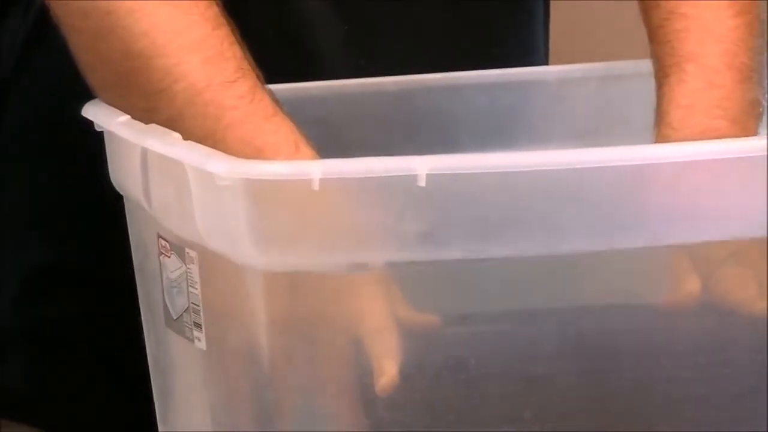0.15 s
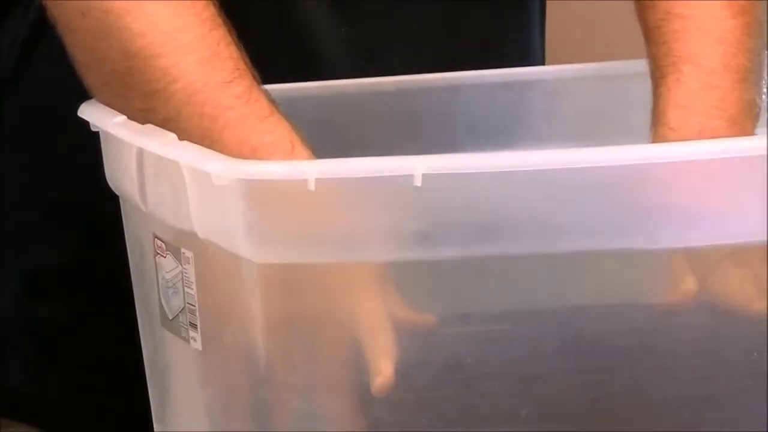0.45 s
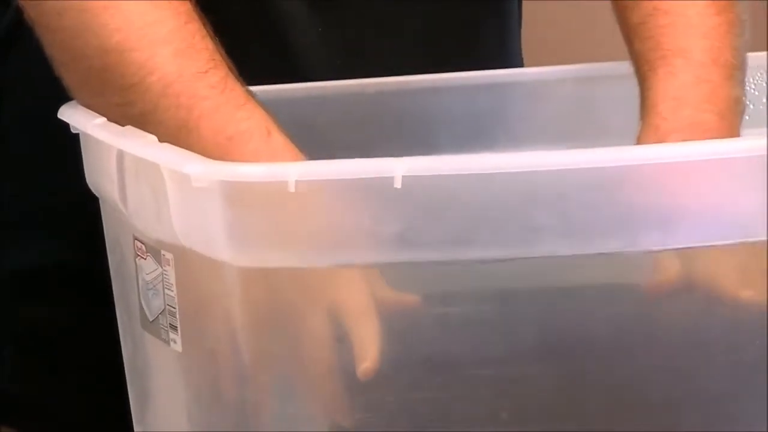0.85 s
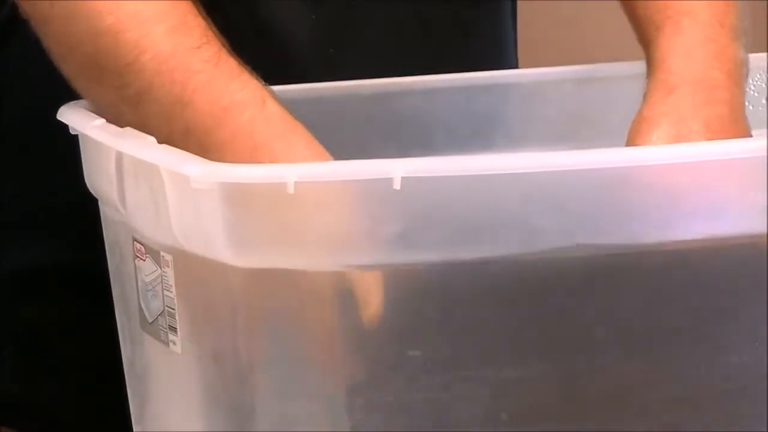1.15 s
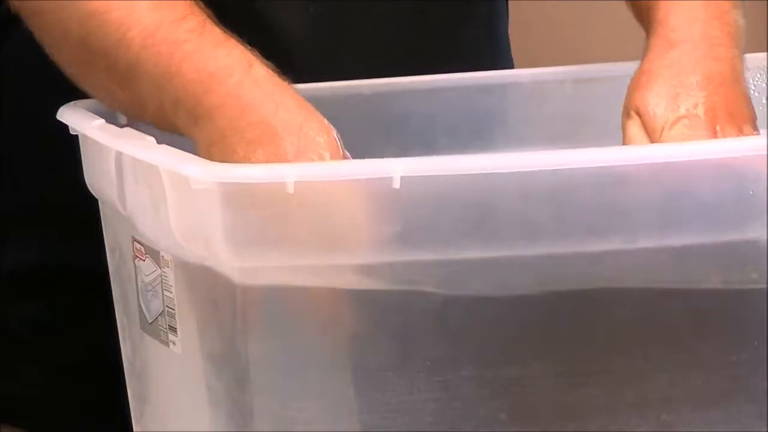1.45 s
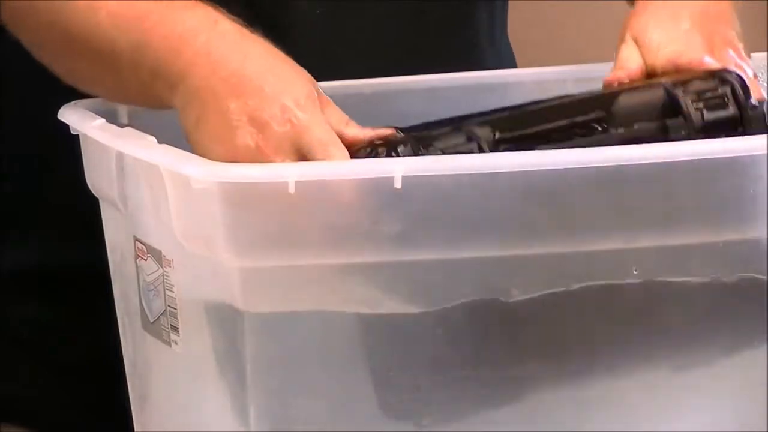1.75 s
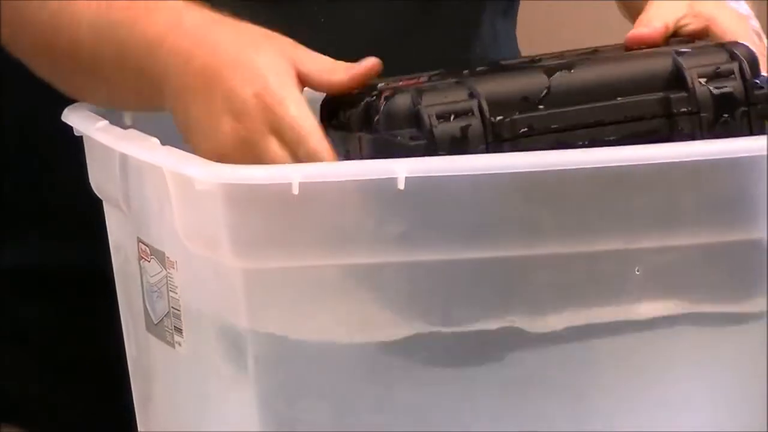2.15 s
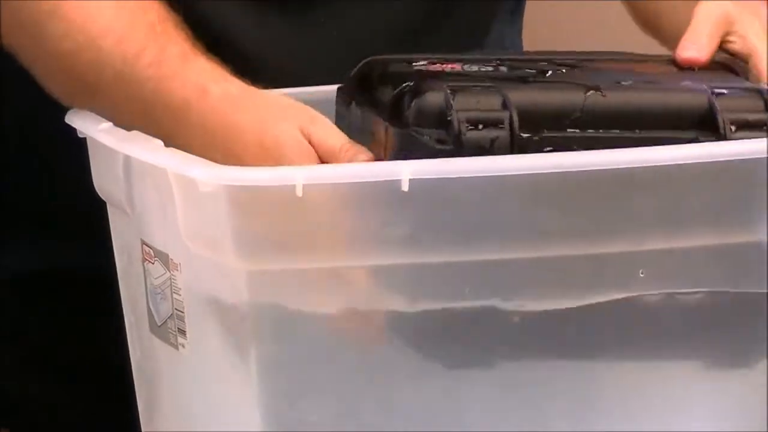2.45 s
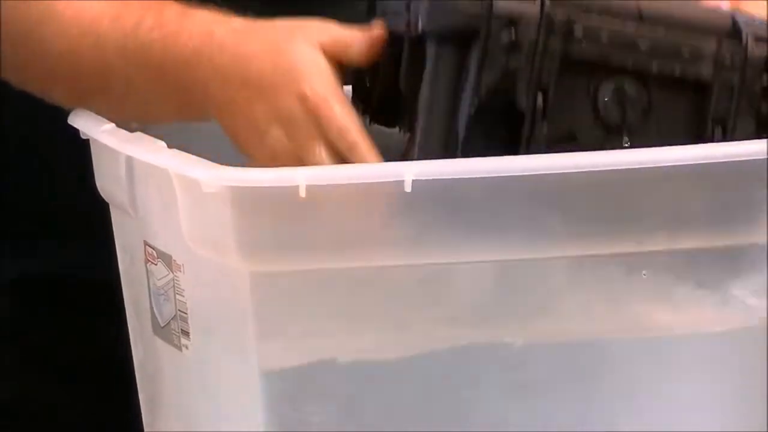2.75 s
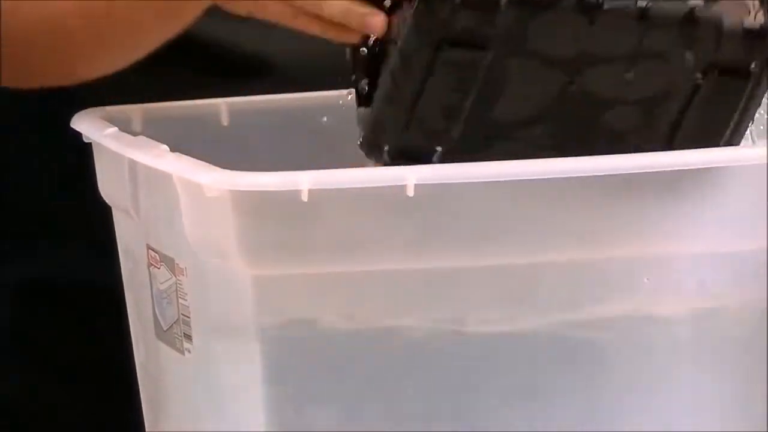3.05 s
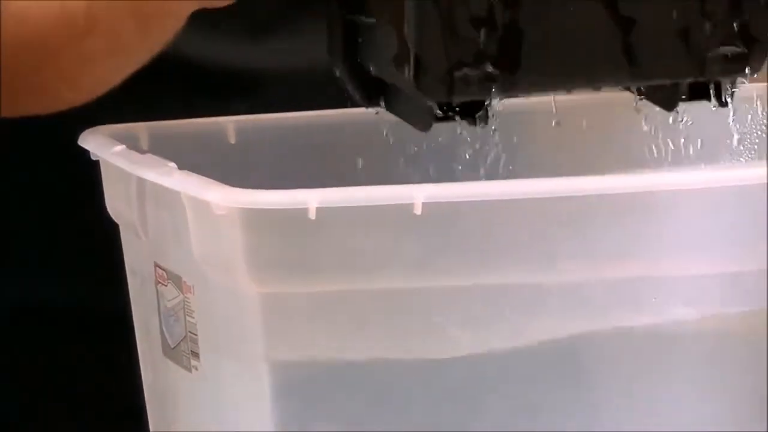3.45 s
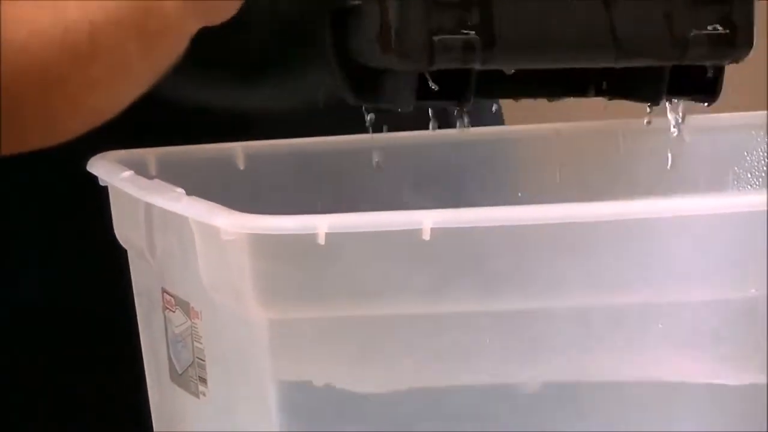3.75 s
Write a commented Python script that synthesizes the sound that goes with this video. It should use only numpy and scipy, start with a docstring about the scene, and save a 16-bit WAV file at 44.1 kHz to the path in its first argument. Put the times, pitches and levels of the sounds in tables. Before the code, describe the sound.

After over a second of near quiet with low room hum, water gushes and bubbles off a lifted case, eases, then streams and drips back into the tub with a plastic click, heard close indoors.

```python
"""Plastic case lifted from a tub of water

A hard plastic case comes out of a plastic tub in a quiet room; water splashes off, then drains.
Trapped bubbles plop as swelling sines, crowds of bubbles ring as resonators, spray is coloured clicks.
Plastic ticks are noise bursts with ringing modes. Ventilation rumbles as coloured noise, a motor whines
as a wavering sine, a faint patter opens the scene, and scattered echoes make the room."""
import sys
import numpy as np
from scipy import signal
from scipy.fft import rfft, irfft
from scipy.io import wavfile

SR = 44100
rng = np.random.default_rng(int(sys.argv[2]) if len(sys.argv) > 2 else 0)


def put_to_file(sound):
    """Save the sound as 16-bit audio at rate SR, in the file named by the first command-line argument."""
    columns = np.atleast_2d(sound).T  # one column per channel
    safe = np.clip(columns, -1, 1)
    whole_steps = np.round(safe * 32767)
    wavfile.write(sys.argv[1], SR, whole_steps.astype(np.int16))


def attenuation_scalar(level_db):
    """Turn a level in dB into a linear amplitude multiplier (20 dB per decade)."""
    decades = np.asarray(level_db, float) / 20
    return 10 ** decades


N = 171990

# ventilation colour, relative: hz, level_db (per Hz)
AIR_COLOUR = [(12, -60), (20, -45), (37, -36), (107, -1.5), (167, -19.5), (187, -16.5), (241, -10.5),
              (277, -17), (623, -17), (677, -23), (737, -17.5), (1250, -25), (2070, -22.5), (2740, -26.5),
              (16000, -40)]
# how alike the air is left and right: hz, likeness (0 to 1)
AIR_LIKENESS = [(30, 0.53), (120, 0.95), (250, 0.66), (600, 0.057), (2000, 0.13), (5000, 0.088),
                (12000, 0.024)]
# stereo balance of the air: hz, left_minus_right_db
AIR_BALANCE = [(30, 3.5), (250, 0), (2000, 0.3), (12000, 0.5)]
# duct resonances: centre_hz, width_hz, level_db
DUCT_RESONANCES = [(57.4, 15, -66), (109.3, 18, -60), (157.2, 13, -61.5), (243.2, 48, -57.5),
                   (311.3, 15, -65.5), (1755, 11, -73), (2300, 110, -68)]
# motor whine: pitch_hz, wobble_hz, level_db
MOTOR_WHINE = (2098, 10, -65.5)
# level of the faint patter: time_s, level_db
PATTER_LEVEL = [(0, -65), (.4, -63.5), (.41, -90)]
# plastic ticks: start_s, level_db (before a 9 dB cut), tilt_db (per octave), left_minus_right_db
TICKS = [(0.1098, -36.5, 5, 4), (0.6943, -35.5, 5.5, 4.5), (2.8799, -35.5, 6, 5), (3.6531, -21, 3.5, -6)]
# colour of the plastic before each tick's tilt, relative: hz, level_db (per Hz)
TICK_COLOUR = [(180, -53), (300, -1), (1500, -4), (2130, 3), (4400, -5.5), (5080, -10), (6270, -20.5),
               (14000, -47)]
# ringing modes of the plastic: pitch_hz, level_db (before a 20 dB cut), t60_s
TICK_MODES = [(1443, -14.5, 0.069), (2780, -11.5, 0.028), (4250, -7, 0.017)]
# streams running off: time_s, fine_spray_db, small_bubbles_db, large_bubbles_db
STREAMS = [(1.38, -91, -89, -72), (1.79, -55.5, -72, -69.5), (1.85, -54.5, -47, -53), (1.98, -54, -46, -50),
           (2.13, -47, -47.5, -50.5), (2.3, -58, -59, -54.5), (2.54, -66, -66, -64.5),
           (3.04, -66.5, -61.5, -65.5), (3.41, -56.5, -62, -55.5), (3.9, -66, -58, -67)]
# sheets of water hitting the surface: landing_s, fine_spray_db, small_bubbles_db (both before a cut), t60_s
SHEETS = [(1.4467, -50.5, -48.5, 0.97), (1.536, -41, -66, 0.082), (1.683, -57, -49, 0.42),
          (1.78, -40, -36.5, 0.59), (1.8494, -50, -45, 0.2), (1.908, -40, -53, 0.42),
          (2.027, -44, -39, 0.35), (2.0976, -33.5, -29.5, 0.11), (2.1795, -38, -35.5, 0.47),
          (2.26, -56, -43, 0.33), (2.463, -45, -44.5, 0.17), (2.9155, -54, -43, 0.17),
          (3.072, -54, -66, 0.64), (3.163, -41, -58, 0.28), (3.2216, -43, -63, 0.68),
          (3.2594, -45, -48, 0.5), (3.3312, -46, -38.5, 0.48), (3.4394, -42.5, -61, 0.17),
          (3.5902, -47.5, -48.5, 0.67)]
# spray colour, relative: hz, level_db (per Hz)
SPRAY_COLOUR = [(2940, -1.5), (5000, 0), (6040, -1.5), (8200, -7), (11000, -8.5), (14500, -17.5),
                (16000, -37)]
# bubble crowds: births_per_s (approximate), low_hz, high_hz, ring_cycles (to -60 dB), trim_db
SMALL_BUBBLES = (1000, 2300, 6986, 26, -3.5)
LARGE_BUBBLES = (900, 1050, 3000, 22, 3)
SLOSH_BUBBLES = (400, 200, 350, 9, 0.1)
# water rocking in the tub: time_s, level_db
SLOSH_LEVEL = [(2.9, -65.5), (3.25, -57), (3.38, -60.5), (3.44, -50.5), (3.58, -66), (3.67, -45.5),
               (3.75, -69), (3.9, -56)]
# single bubbles that stand out: time_s, peak_db, pitch_hz, swarm_db (relative, before the size law)
PLOPS = [(2.219, -43.5, 548, -9), (2.249, -51, 474, -18), (1.445, -56.5, 710, -8), (1.942, -38, 1120, -14),
         (1.964, -40, 1320, -10), (1.999, -44, 1320, -2), (2.089, -43, 1200, -3), (2.124, -39, 1100, -15),
         (2.138, -42.5, 827, -1), (2.182, -27, 760, -24), (2.228, -38.5, 733, -14), (2.483, -39, 1215, -18),
         (2.512, -44.5, 1165, -11), (3.239, -45.5, 1075, 0), (3.272, -46, 1024, -11),
         (3.332, -40, 1220, -18), (3.591, -49, 934, -20), (3.674, -40, 1197, -28), (1.4606, -49, 1350, -8),
         (1.8238, -44.5, 1530, 2.5), (2.0363, -40.5, 1470, 3.5), (2.0862, -35.5, 1564, -8),
         (2.15, -35.5, 1510, -7), (2.2573, -39.5, 1488, -3), (2.2857, -38.5, 1470, -8.5),
         (2.3052, -36.5, 1425, -20), (2.47, -42.5, 1470, -15), (2.733, -54, 1390, -20),
         (3.0914, -55, 1410, 2), (3.1423, -53, 1400, -6), (3.3154, -45.5, 1350, 2),
         (3.4526, -31.5, 1482, -9), (3.7575, -31.5, 1500, -7), (1.4626, -54.5, 1770, 5),
         (1.7275, -45.5, 2530, -5), (1.8592, -38.5, 1656, -11), (1.8994, -40.5, 1877, -2.5),
         (2.2174, -33.5, 2380, -4), (2.362, -42.5, 2340, -19), (2.374, -43, 1960, -21),
         (3.2041, -44, 1980, -17), (3.2555, -39, 2300, -4.5), (3.3638, -45, 2250, -9),
         (3.3817, -37, 2280, -0.5), (3.4376, -40, 1930, -9), (3.4855, -33.5, 1952, -8),
         (3.4994, -37.5, 1830, -14), (3.5892, -27, 1967, -23), (3.657, -31, 2090, -43),
         (3.8277, -41, 2300, -12), (1.4451, -55, 2860, -11), (1.497, -46, 4150, -18),
         (1.5359, -49, 3630, -14), (1.6831, -46, 3280, 0.5), (1.7975, -35.5, 2976, -1),
         (1.804, -30.5, 3234, -12), (1.8194, -35, 3350, -15), (2.0183, -30, 2576, -10),
         (2.1001, -40, 2890, -1), (2.2074, -43, 2780, 0.5), (2.8, -52.5, 3130, -2),
         (2.9158, -44.5, 2713, 0), (3.1647, -45, 4300, -12), (3.1936, -43.5, 4130, -2),
         (3.2194, -48, 4200, -13), (3.3333, -36.5, 4080, -6), (3.3494, -35, 3800, -12),
         (3.3677, -45, 3160, 0.5), (3.8706, -40.5, 3280, -5), (1.7489, -50, 5300, -2),
         (1.9056, -38, 6020, -3.5), (2.0308, -34.5, 4350, -1), (2.5336, -49, 5000, -4),
         (3.2375, -44, 4800, -3), (3.248, -35, 4900, -8), (3.2874, -41, 4560, -1), (3.3094, -39, 4360, -5),
         (3.3867, -40.5, 5900, -3), (3.4855, -50, 5600, 4.5), (3.8766, -47, 5000, -9),
         (3.0709, -50.5, 10740, -2.5), (3.709, -55.5, 8750, 2.5)]

WATER_PAN_DB = -1  # left minus right


def rms_one(x):
    """Scale to unit rms."""
    return x / np.sqrt(np.mean(x ** 2) + 1e-20)


def at_hz(points, hz):
    """Read a table on a log-frequency axis."""
    table_hz, values = np.transpose(points)
    return np.interp(np.log(np.maximum(hz, 1)), np.log(table_hz), values)


def curve(rows):
    """Columns of a table over time, at -120 dB outside it."""
    time_s, *columns = np.transpose(rows)
    now_s = np.arange(N) / SR
    return [np.interp(now_s, time_s, column, left=-120, right=-120) for column in columns]


def drift(rate_hz):
    """Slow random wandering of unit rms: noise through two equal low-pass poles."""
    pole = np.exp(-80 * np.pi * rate_hz / SR)  # runs on every 40th sample
    noise = rng.standard_normal(N // 40 + 2002)
    slow = signal.lfilter([1], [1, -2 * pole, pole * pole], noise)[2000:]  # skip the warm-up
    return np.interp(np.arange(N) / 40, np.arange(len(slow)), rms_one(slow))


def ring(clicks, hz, t60_s):
    """A two-pole resonator: a unit click sets off a decaying sine of height about 1."""
    radius = attenuation_scalar(-60 / (t60_s * SR))
    angle = 2 * np.pi * hz / SR
    feedback = [1, -2 * radius * np.cos(angle), radius * radius]
    return signal.lfilter([0, np.sin(angle)], feedback, clicks + 1e-18)


def pan(left_minus_right_db):
    """Gains of the two channels."""
    return attenuation_scalar(np.array([[left_minus_right_db / 2], [-left_minus_right_db / 2]]))


def grains(per_s, spread_db, clump_db):
    """Random clicks of uneven size and either sign, whose density drifts so that they clump."""
    sizes = attenuation_scalar(spread_db * np.minimum(rng.exponential(1, N), 5)) * rng.choice([-1, 1], N)
    luck = rng.random(N)
    chance = per_s * attenuation_scalar(clump_db * drift(15)) / SR
    return sizes * (luck < chance)


def air():
    """Ventilation: coloured noise plus noise ringing in duct resonances whose levels waver."""
    hz = np.fft.rfftfreq(N, 1 / SR)
    alike = np.clip(at_hz(AIR_LIKENESS, hz), 0, 1)
    balance = attenuation_scalar(np.outer([.5, -.5], at_hz(AIR_BALANCE, hz)))

    def stereo(gain):
        """Noise with the likeness and balance of the air."""
        mid, side = rfft(rng.standard_normal((2, N)))
        spectrum = np.sqrt(1 + alike) * mid + np.sqrt(1 - alike) * side * [[1], [-1]]
        return irfft(gain * balance * spectrum, N)

    out = attenuation_scalar(-52.5) * rms_one(stereo(attenuation_scalar(at_hz(AIR_COLOUR, hz))))
    for centre_hz, width_hz, level_db in DUCT_RESONANCES:
        resonance = 1 / (1 + (2 * (hz - centre_hz) / width_hz) ** 2)
        waver_db = 0.7 * drift(10)
        out += attenuation_scalar(level_db + waver_db) * rms_one(stereo(resonance))
    return out


def whine():
    """A thin motor whine: a sine whose pitch and level waver a little."""
    pitch_hz, wobble_hz, level_db = MOTOR_WHINE
    turns = np.cumsum(pitch_hz + wobble_hz * drift(17)) / SR
    level = attenuation_scalar(level_db + 4.5 * drift(22))
    return level * np.sqrt(2) * np.sin(2 * np.pi * turns) * pan(0.5)


def patter():
    """A faint, nearly even patter of dull pulses, each click exciting paired resonators."""
    per_s, first_s, ring_cycles = 30, .017, 16.0
    beats_s = np.arange(first_s, N / SR - .1, 1 / per_s)
    luck = rng.standard_normal((len(beats_s), 2))
    late_s = .001 * np.abs(luck[:, 0])
    clicks = np.zeros(N)
    clicks[((beats_s + late_s) * SR).astype(int)] = attenuation_scalar(3 * luck[:, 1])
    # the second, shorter resonator softens the onset
    return rms_one(sum(ring(ring(clicks, hz, ring_cycles / hz), hz, 8.6 / hz) for hz in (890, 950)))


def ticks():
    """Plastic ticks: a snap and short dry rattle in the plastic's colour, with modes that ring on."""
    hold_s, rattle_t60_s, attack_s, snap, snap_decay_s = .003, .014, 0.00081, .9, 0.001
    size = 2048
    out, t = np.zeros((2, N)), np.arange(size) / SR
    hz = np.fft.rfftfreq(size, 1 / SR)
    decay = attenuation_scalar(-60 * np.maximum(t - hold_s, 0) / rattle_t60_s)
    shape = decay * (np.minimum(t / attack_s, 1) + snap * np.exp(-t / snap_decay_s))
    for start_s, level_db, tilt_db, side_db in TICKS:
        noise = rng.standard_normal(size)
        spectrum = rfft(noise)
        flat = spectrum / np.abs(spectrum)  # random phases only
        colour_db = at_hz(TICK_COLOUR, hz) + tilt_db * np.log2(hz / 3000 + .01)
        burst = rms_one(irfft(flat * attenuation_scalar(colour_db)))
        modes = sum(attenuation_scalar(mode_db) * ring(noise * shape, mode_hz, t60_s) / 10
                    for mode_hz, mode_db, t60_s in TICK_MODES)
        i = int(start_s * SR) - 20
        out[:, i:i + size] += attenuation_scalar(level_db - 9.0) * (burst * shape + modes) * pan(side_db)
    return out


def spray():
    """Fizzing spray: dense coloured droplet clicks, partly their own in each channel."""
    crackle = np.array([grains(per_s=2500, spread_db=3.3, clump_db=4) for layer in range(3)])
    both = crackle[0] + 1.7 * crackle[1:]
    colour = attenuation_scalar(at_hz(SPRAY_COLOUR, np.fft.rfftfreq(N, 1 / SR)))
    return attenuation_scalar(0.5) * rms_one(irfft(rfft(both) * colour, N))


def bubbles(kind):
    """A crowd of random bubbles dealt to 20 pitches; paired resonators make each swell softly."""
    per_s, low_hz, high_hz, ring_cycles, trim_db = kind
    born = grains(per_s, spread_db=3.6, clump_db=3.5)
    dealt = rng.integers(0, 20, N)
    rings = np.zeros(N)
    for k, hz in enumerate(np.geomspace(low_hz, high_hz, 20)):
        rung = ring(born * (dealt == k), hz, ring_cycles / hz)
        rings += rms_one(ring(rung, hz, 1.96 / hz))
    return rms_one(rings) * attenuation_scalar(trim_db)


def surges():
    """Power envelopes of spray and small bubbles: each sheet lands at once and dies away."""
    attack_s, fine_trim_db, small_trim_db = .005, -5.5, -2
    power = np.zeros((2, N))
    for landing_s, fine_db, small_db, t60_s in SHEETS:
        t = np.maximum(np.arange(N) / SR - landing_s + attack_s / 2, 0)
        shape = np.minimum(t / attack_s, 1) * attenuation_scalar(-60 * t / max(t60_s, .02))
        levels = attenuation_scalar(np.array([[fine_db + fine_trim_db], [small_db + small_trim_db]]))
        power += (shape * levels) ** 2
    return power


def bubble(hz):
    """One bubble swells in a few cycles, rises a little in pitch and dies."""
    attack_cycles, pitch_rise = 3.5, .07  # the rise is a fraction of the pitch over the ring
    turns = hz * np.arange(SR // 12) / SR
    cycles = 32.5 * (hz / 1000) ** 0.41  # to -60 dB: smaller bubbles ring more cycles
    shape = (1 - np.exp(-turns / attack_cycles)) ** 2 * attenuation_scalar(-60 * turns / cycles)
    phase = turns + pitch_rise * turns ** 2 / cycles / 2
    return shape / shape.max() * np.sin(2 * np.pi * phase)


def plops():
    """Each plop is one bubble, then a fading swarm of ten like-sized ones, fainter after large bubbles."""
    swarm_s, detune, fade_db_per_s = .018, 0.097, 420
    size_db_per_octave, pan_spread_db = 4, 1.5
    out = np.zeros((2, N + SR))
    for time_s, peak_db, pitch_hz, swarm_db in PLOPS:
        draw = rng.random((10, 3))
        late_s = np.r_[0, -swarm_s * np.log(1 - .9 * draw[:, 0])]
        pitches_hz = np.r_[1, 1 + detune * (2 * draw[:, 1] - 1)] * pitch_hz
        swarm_db = swarm_db + size_db_per_octave * min(np.log2(pitch_hz / 2000), 0)
        place = pan(WATER_PAN_DB + pan_spread_db * (2 * draw[0, 2] - 1))
        for k, (delay_s, hz) in enumerate(zip(late_s, pitches_hz)):
            wave = bubble(hz)
            i = int((time_s + delay_s - 1.5 / pitch_hz) * SR)  # begins 1.5 cycles early
            level_db = peak_db + swarm_db * (k > 0) - fade_db_per_s * delay_s
            out[:, i:i + len(wave)] += attenuation_scalar(level_db) * wave * place
    return out[:, :N]


def room(x):
    """Scattered echoes off tub and walls, thickening and dying away, with a softened treble."""
    t60_s, cut_hz, gap_s, level_db, alike = .2, 6000, 0.0045, -6, 0.89
    t = np.arange(SR // 2) / SR
    chance = 1100 * (1 + t / .03) / SR  # 1100 echoes per second at first
    echoes = rng.standard_normal((3, len(t))) * (rng.random((3, len(t))) < chance)
    tail = np.sqrt(alike) * echoes[0] + np.sqrt(1 - alike) * echoes[1:]
    tail *= attenuation_scalar(-60 * t / t60_s) * np.clip((t - gap_s) / 0.0003, 0, 1)
    tail = signal.sosfilt(signal.butter(1, cut_hz, fs=SR, output="sos"), tail)
    tail /= np.sqrt(np.mean(np.sum(tail ** 2, axis=1)))
    return attenuation_scalar(level_db) * signal.fftconvolve(x.mean(axis=0)[None], tail)[:, :N]


def scene():
    """Water and ticks in the room, over the ventilation and the whine."""
    fine_db, small_db, large_db = curve(STREAMS)
    stream_power = attenuation_scalar(np.array([fine_db, small_db])) ** 2
    fine, small = np.sqrt(surges() + stream_power)
    crowd = small * bubbles(SMALL_BUBBLES) + attenuation_scalar(large_db) * bubbles(LARGE_BUBBLES)
    slosh = attenuation_scalar(curve(SLOSH_LEVEL)[0]) * bubbles(SLOSH_BUBBLES)
    crowd += slosh + attenuation_scalar(curve(PATTER_LEVEL)[0]) * patter()
    water = crowd * pan(WATER_PAN_DB) + fine * spray() + plops()
    clicks = ticks()
    echoes = room(water + attenuation_scalar(-26) * clicks)  # the ticks stay nearly dry
    return water + clicks + echoes + air() + whine()


def band_limit(x):
    """A steep low-pass at the top of the band."""
    return signal.sosfilt(signal.butter(12, 16100, fs=SR, output="sos"), x)


def record(dry):
    """A steep low-pass takes off the top, 40 dB down from 15950 Hz."""
    top_cut = signal.cheby2(10, 40, 15950, fs=SR, output="sos")
    mix = signal.sosfilt(top_cut, dry)
    return band_limit(mix)


dry = scene()
out = record(dry)
put_to_file(out)
```